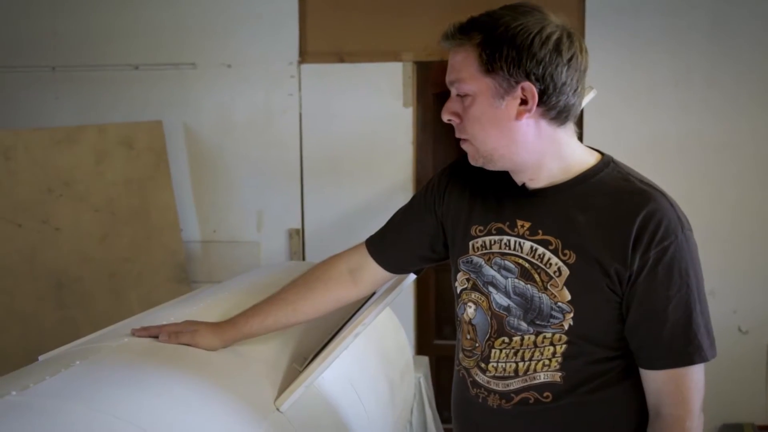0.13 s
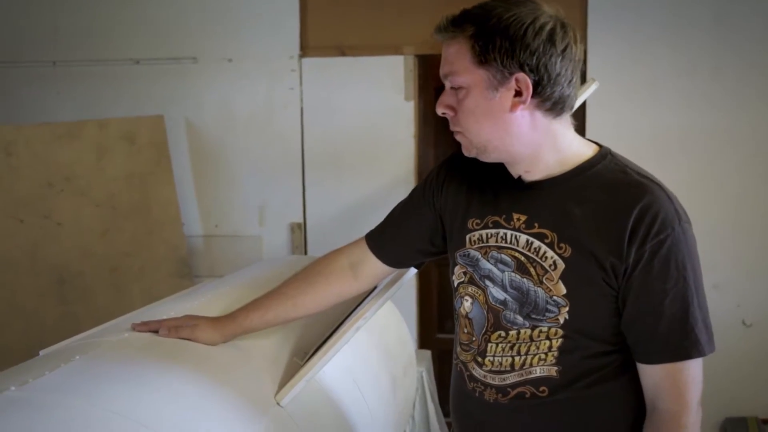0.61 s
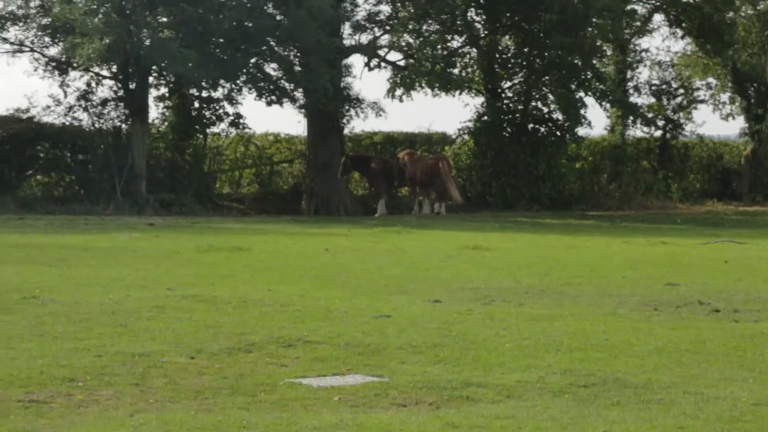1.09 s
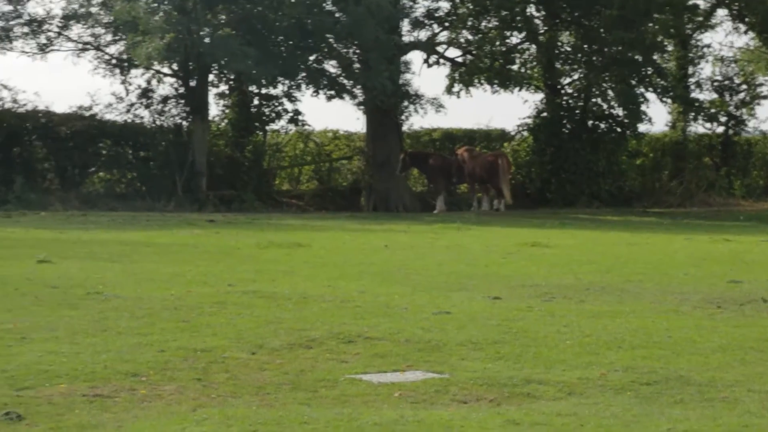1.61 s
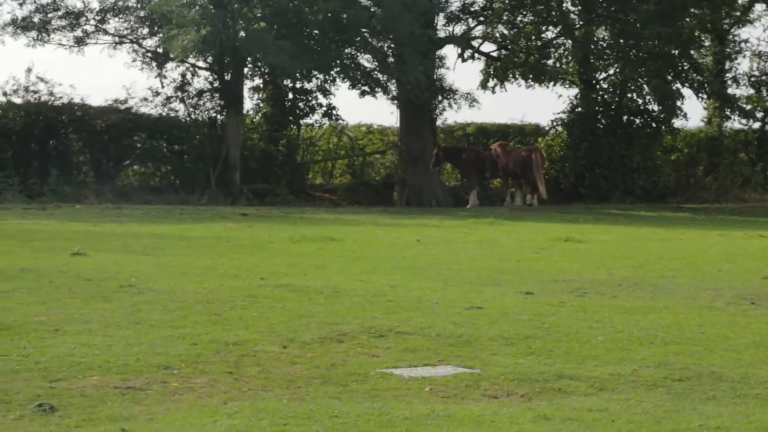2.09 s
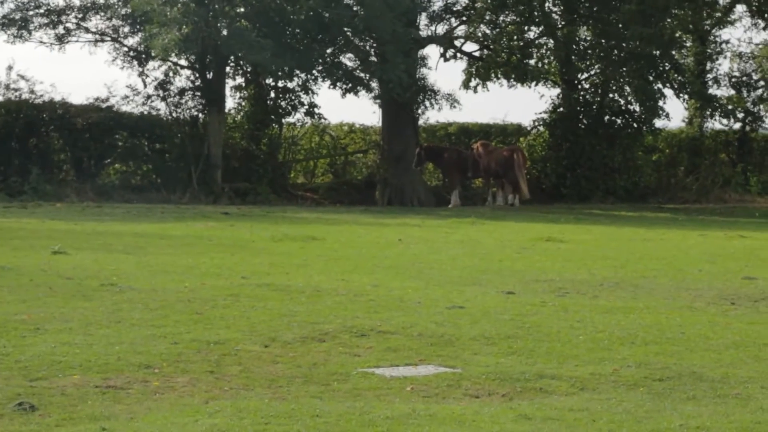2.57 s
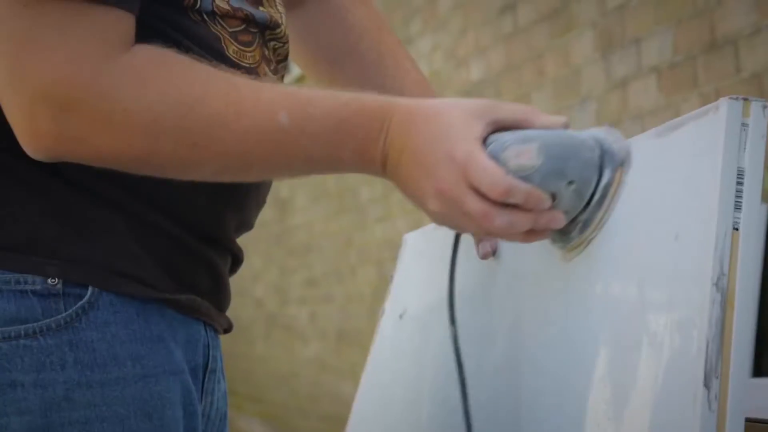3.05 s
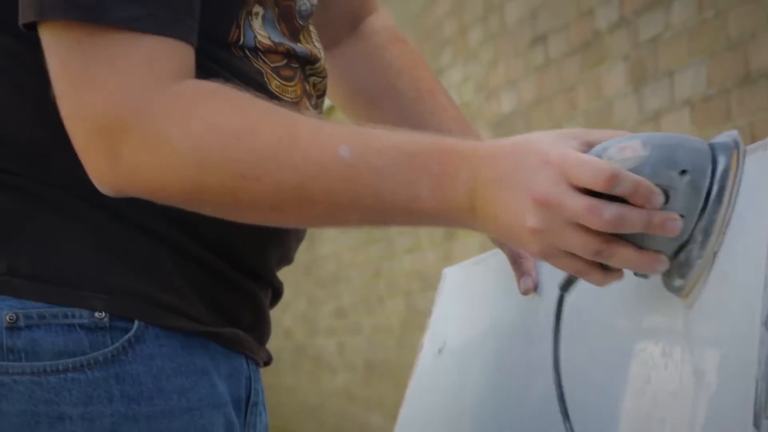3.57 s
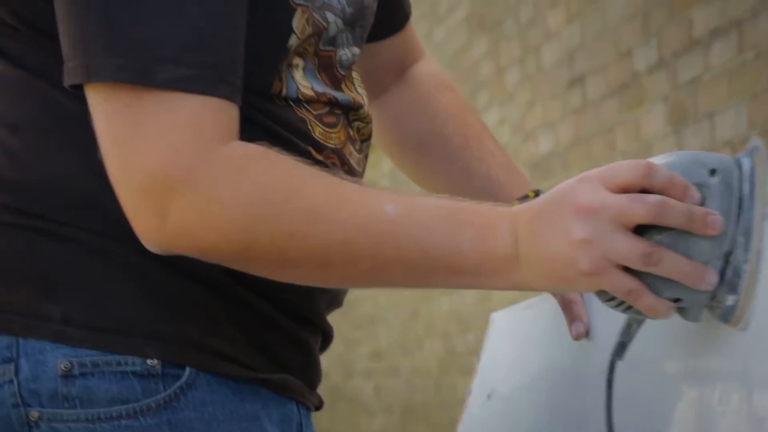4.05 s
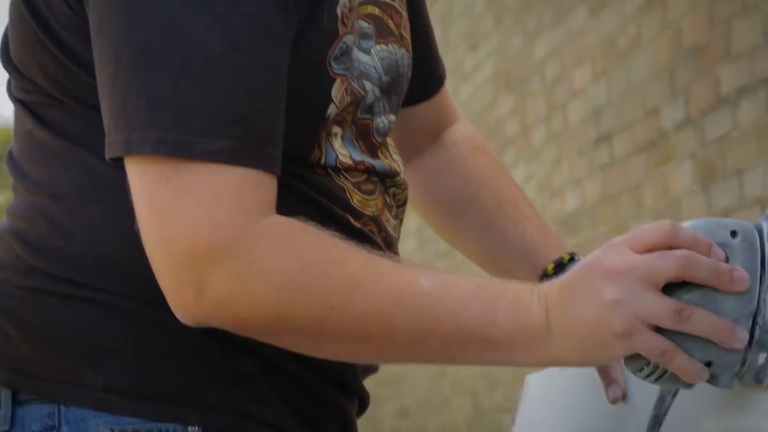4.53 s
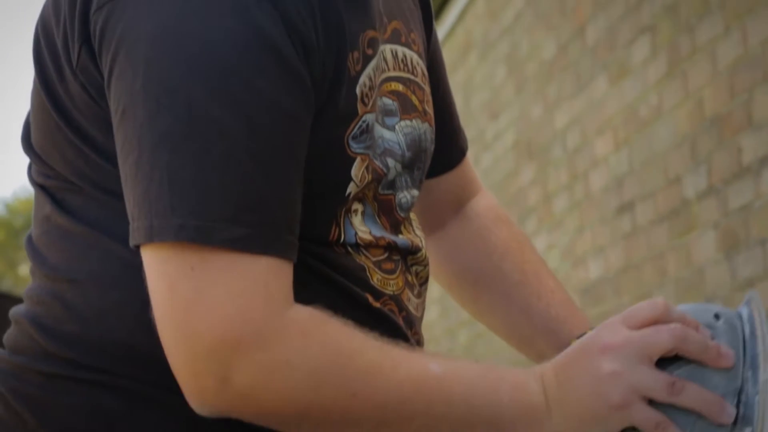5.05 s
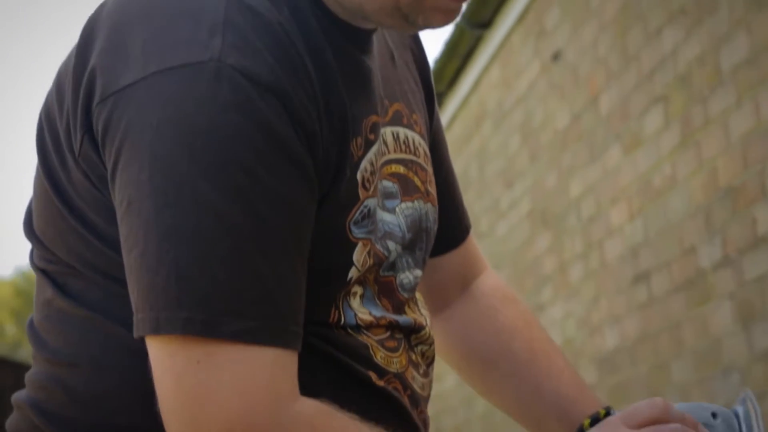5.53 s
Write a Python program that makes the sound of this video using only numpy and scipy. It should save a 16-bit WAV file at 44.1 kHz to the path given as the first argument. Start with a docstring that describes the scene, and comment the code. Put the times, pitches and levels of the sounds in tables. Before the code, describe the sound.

At 0 s a hushed workshop: low heaving rumble fading in lumps, a faint wavering hum and thin room air, with tiny dry ticks around 0.1-0.2 s and again near 0.7-1.0 s. From about 0.25 s a bird, left of centre, gives seven quick, falling, trilled chirps about an eighth of a second apart, growing louder until just after 1 s, with a slight echo off trees. At about 0.8 s the room drops away and wide, soft meadow air with leaves and distant twittering takes over. From about 1.2 s an electric sander fades in, centred, clear by 2 s. Its low motor drone rattles a hollow panel, with shifting overtones, a thin whine and gritty hiss. Around 3 s it becomes fuller while the very top of the hiss dulls; after 3.7 s it is louder, wavering with each stroke, motor speed drifting slightly, and still running at the end, 5.6 s.

```python
"""A quiet workshop (rumble, wavering hum, small ticks) drops away while a meadow and a chirping bird come up.
Rumble, air and leaves are filtered noise, the hum a drifting sine; the bird is a falling, trilled sine.
Then an electric sander fades in outdoors, working a large hollow panel: the orbiting pad drives the panel at
multiples of the motor speed, the commutator whines and the grit hisses, swelling once a turn."""
import sys
import numpy as np
from scipy import signal
from scipy.fft import rfft, irfft
from scipy.io import wavfile
from scipy.ndimage import uniform_filter1d

SR = 44100
rng = np.random.default_rng(int(sys.argv[2]) if len(sys.argv) > 2 else 0)


def pcm_store(signal):
    """Save signal as 16-bit PCM."""
    levels = np.round(np.clip(np.atleast_2d(signal), -1, 1) * 32767)
    wavfile.write(sys.argv[1], SR, levels.astype(np.int16).T)


def gain_from_db(level_db):
    """Convert decibel levels to linear amplitude factors (20 dB per decade)."""
    decades = np.asarray(level_db, float) / 20
    return 10 ** decades


N = 249120   # samples
CUT_S = 0.771   # the workshop starts to drop away


def rms_one(x):
    """Scale to rms 1."""
    return x / np.sqrt(np.mean(x ** 2) + 1e-20)


def in_time(rows):
    """Columns of a table at every sample, joined by straight lines."""
    s, *columns = np.transpose(rows)
    return [np.interp(np.arange(N) / SR, s, c) for c in columns]


def sounding(start_s, end_s, edge_s):
    """Gain 1 between two moments, with linear ramps outside them."""
    return np.interp(np.arange(N) / SR, [start_s - edge_s, start_s, end_s, end_s + edge_s], [0, 1, 1, 0])


def bump(centre_s, width_s):
    """Bell-shaped gain, 1 at its centre."""
    return np.exp(-.5 * ((np.arange(N) / SR - centre_s) / width_s) ** 2)


def drift(rate_hz):
    """Slow random curve of rms 1: noise at every 40th sample through a double one-pole low-pass."""
    r = np.exp(-80 * np.pi * rate_hz / SR)
    slow = signal.lfilter([1], [1, -2 * r, r * r], rng.standard_normal(N // 40 + 2002))
    slow = slow[2000:]   # leave out the settling of the filter
    return np.interp(np.arange(N) / 40, np.arange(len(slow)), rms_one(slow))


def coloured(x, *spectra):
    """Shape a signal by the sum of (Hz, dB) curves, drawn over log frequency."""
    hz = np.log(np.arange(N // 2 + 1) * SR / N + 1)
    db = sum(np.interp(hz, np.log(np.array(s)[:, 0]), np.array(s)[:, 1]) for s in spectra)
    return irfft(rfft(x) * gain_from_db(db), N)


def filtered(x, order, hz, kind):
    """Butterworth filter."""
    return signal.sosfilt(signal.butter(order, hz, kind, fs=SR, output="sos"), x)


def band(x, low_hz, high_hz):
    """Band-pass, rms 1."""
    return rms_one(filtered(x, 2, [low_hz, high_hz], "band"))


def wide(spectrum, width):
    """Stereo noise of a given colour and side-over-mid width; mid rms 1."""
    mid, side = rng.standard_normal((2, N))
    mid = coloured(mid, spectrum)
    return (mid + coloured(side, spectrum, width) * np.array([[1], [-1]])) / np.std(mid)


def after_cut():
    """Seconds since the workshop began to drop."""
    return np.maximum(np.arange(N) / SR - CUT_S, 0)


def rumble():
    """Heaving low noise, slightly louder on the left, dying away fast after the cut."""
    # the rumble heaves: t/s, level added at the peak/dB
    lumps = [(0, -35), (.2, -41), (.465, -44), (.62, -53), (.76, -53)]
    base_db, lump_s, tail_db_per_s = -47, 0.031, 150
    heave = gain_from_db(base_db) + sum(gain_from_db(db) * bump(s, lump_s) for s, db in lumps)
    heave = heave * gain_from_db(-tail_db_per_s * after_cut())
    balance = gain_from_db(np.array([[.7], [-.7]]))   # left and right
    return heave * balance * band(rng.standard_normal(N), 15.8, 29.0)


def hum(cut_db):
    """A sine wavering in pitch and level, whose fourth partial flares once."""
    # hum before its wavering and the cut: t/s, peak level/dB
    hum_level = [(0, -44), (.05, -70), (.2, -70), (.37, -54), (.55, -53), (.78, -49)]
    hum_hz, pitch_spread, level_spread_db = 172.6, 0.0096, 5.8
    phase = 2 * np.pi * np.cumsum(hum_hz * (1 + pitch_spread * drift(7.2))) / SR
    flare = gain_from_db(-55.5) * sounding(0.61, 0.67, .03) * np.sin(4 * phase)
    return gain_from_db(in_time(hum_level)[0] + cut_db + level_spread_db * drift(13)) * np.sin(phase) + flare


def room_air(cut_db):
    """Room air as coloured stereo noise."""
    # colour of the air: f/Hz, relative density/dB
    air_colour = [(35, -30), (60, -2), (167, -7), (386, -14.5), (414, -14.5), (690, -13.5), (2160, -29),
                  (5110, -38), (6150, -40), (6910, -37), (15600, -55)]
    # stereo width: f/Hz, side over mid/dB
    air_width = [(60, -14), (110, -21), (200, -22), (380, -12), (700, -13), (1290, -6), (2380, -12),
                 (4400, -8), (8120, -4), (15000, -4)]
    return gain_from_db(-51 + cut_db) * wide(air_colour, air_width)


def room_tones():
    """Faint thin tones, made of noise 60 Hz wide with a wandering level."""
    # tones: f/Hz, level before the wander/dB, end t/s
    thin_tones = [(2700, -73, .2), (6900, -78, 0.81)]
    out = np.zeros(N)
    for hz, db, end_s in thin_tones:
        tone = band(rng.standard_normal(N), hz - 30, hz + 30)
        out += gain_from_db(db + 3.5 * drift(16)) * tone * sounding(-1, end_s, .02)
    return out


def ticks():
    """Dry ticks: band-passed noise snaps that decay in about a millisecond."""
    # ticks: t/s, peak level/dB, f/Hz
    tick_rows = [(0.104, -49, 3800), (.168, -45, 9000), (.201, -41.5, 9000), (.212, -44, 8500),
                 (.205, -51, 2900), (.672, -43, 3620), (.845, -49, 3400), (.975, -50, 3430)]
    out = np.zeros(N)
    t = np.arange(400) / SR
    for s, db, hz in tick_rows:
        snap = rng.standard_normal(400) * np.exp(-t / 0.0011)
        tick = filtered(snap, 2, [hz / 1.25, min(hz * 1.19, 15000)], "band")
        start = round(s * SR)
        out[start:start + 400] += gain_from_db(db) * tick / np.abs(tick).max()
    return out


def workshop():
    """Rumble, hum and air that drop away at the cut, plus thin tones and ticks."""
    cut_db = -17 * np.minimum(after_cut() / 0.029, 1)
    bed = rumble() + hum(cut_db) + room_air(cut_db)
    return bed * sounding(-1, .9, .05) + room_tones() + ticks()


def meadow():
    """Leaves and far traffic as a wide soft hiss; far birds and insects blur into a grainy band."""
    # air of the meadow: t/s, mid rms level/dB
    air_level = [(0, -59), (.5, -60), (.9, -56), (1.3, -53.5), (5.65, -65)]
    # colour of that air: f/Hz, relative density/dB
    air_colour = [(29, -67), (50, -37), (87, -6.5), (141, 1.5), (174, -5.5), (502, -15.5), (1140, -17.5),
                  (1550, -17), (1750, -19.5), (2570, -25.5), (5040, -24.5), (5820, -25.5), (15600, -27.5)]
    # stereo width: f/Hz, side over mid/dB
    air_width = [(60, -15), (110, -13), (200, -13), (380, -8.5), (700, -5), (1290, -5.5), (2380, -5.5),
                 (4400, -11), (8120, -7), (15000, 1)]
    # far birds and insects: t/s, rms level/dB
    twitter_level = [(.2, -75), (.6, -64), (1.3, -61.5), (5.65, -73)]
    chatter = band(rng.standard_normal((2, N)) * gain_from_db(2.3 * drift(70)), 4220, 4940)
    chatter = gain_from_db(in_time(twitter_level)[0]) * chatter
    leaves = gain_from_db(-69.5) * band(rng.standard_normal((2, N)), 7200, 7700) * sounding(0.81, 6, 0.65)
    return leaves + gain_from_db(in_time(air_level)[0]) * wide(air_colour, air_width) + chatter


def birds():
    """One bird repeats a falling, trilled chirp with an echo off the trees (decaying noise as reverb)."""
    # the repeats: start t/s, relative level/dB
    chirps = [(.245, -72), (.372, -69), (.495, -65), (.618, -61), (.745, -59.5), (.873, -57.5), (1, -56)]
    # shape of one chirp: t/s, f/Hz, relative level/dB
    chirp_shape = [(0, 5800, -7), (.012, 5350, -2), (.022, 5050, 6), (.048, 4950, -2), (.064, 4930, -27)]
    trill_hz, trill_depth, roughness, pitch_spread = 110, 0.66, 0.47, 0.0084
    out = np.zeros(N)
    s, hz, db = np.transpose(chirp_shape)
    t = np.arange(int(s[-1] * SR)) / SR
    for start_s, level_db in chirps:
        bend, beat = rng.standard_normal(2)   # each chirp has its own pitch offset and trill phase
        note = np.sin(2 * np.pi * np.cumsum(np.interp(t, s, hz) * (1 + pitch_spread * bend)) / SR)
        rough = uniform_filter1d(rng.standard_normal(len(t)), size=60) * np.sqrt(60)
        trill = 1 + trill_depth * np.sin(2 * np.pi * trill_hz * t + beat) + roughness * rough
        start = round(start_s * SR)
        out[start:start + len(t)] += gain_from_db(level_db + np.interp(t, s, db)) * note * trill
    tail = rng.standard_normal(6000) * np.exp(-np.arange(6000) / 1500)
    return out + gain_from_db(-40) * signal.fftconvolve(out, tail)[:N]


def panel(turn, ripple, lag, moved, eased_db):
    """The orbiting pad drives the hollow panel: a drum at the motor speed and strong low multiples."""
    # the whole panel drums once a turn: t/s, rms level/dB
    drum_level = [(1.3, -72), (1.43, -81), (1.46, -63), (1.84, -49.5), (2.13, -59), (2.49, -38.5),
                  (2.8, -42), (2.86, -62), (2.91, -43), (2.99, -64), (3.15, -43), (4.12, -30.5),
                  (4.25, -33), (4.51, -28), (4.77, -34), (4.87, -29), (5.03, -35.5), (5.65, -31)]
    # gain on the strong multiples as the sander comes in: t/s, gain/dB
    fade_in = [(1.3, -30), (1.5, -16), (2, -8), (3, 0)]
    # resting level of the strong multiples (12 comes from the armature slots), before fade and wander:
    # multiple, level before the pad moves down the panel/dB, level after/dB
    resting = [(2, -44.5, -44), (3, -41.5, -44), (4, -43.5, -47.5), (5, -45.5, -46.5), (6, -48, -47.5),
               (7, -47, -45.5), (8, -46, -46), (10, -49, -46.5), (12, -50, -45)]
    # an overtone swells as the pad crosses a lively spot: t/s, width/s, multiple, added level/dB
    swells = [(1.48, 0.062, 2, -38), (1.52, 0.1, 3, -44.5), (1.64, 0.07, 4, -35), (1.65, 0.082, 2, -33.5),
              (1.68, 0.026, 3, -34), (1.8, 0.035, 2, -34), (1.84, 0.041, 7, -42), (1.97, 0.072, 4, -35),
              (2.0, 0.026, 10, -45.4), (2.08, 0.08, 3, -35.5), (2.11, 0.028, 6, -37),
              (2.12, 0.038, 7, -35.5), (2.33, 0.029, 4, -32.5), (2.37, 0.039, 3, -35),
              (2.41, 0.05, 10, -39), (2.45, 0.18, 5, -39.5), (2.49, 0.13, 2, -34), (2.55, 0.075, 4, -32),
              (2.56, 0.03, 3, -46), (2.61, 0.035, 6, -41.9), (2.73, 0.09, 3, -44), (2.741, 0.03, 7, -44),
              (2.87, 0.045, 4, -32), (2.9, 0.029, 5, -38.5), (2.98, 0.023, 10, -41.5),
              (2.99, 0.046, 6, -43), (3.02, 0.046, 3, -30), (3.051, 0.024, 4, -42.1), (3.28, 0.16, 2, -32),
              (3.31, 0.1, 4, -32.5), (3.37, 0.13, 5, -43), (3.52, 0.037, 2, -42), (3.56, 0.019, 3, -40.5),
              (3.57, 0.09, 12, -45), (3.62, 0.031, 4, -42), (3.69, 0.019, 5, -40), (3.7, 0.053, 3, -35.5),
              (3.71, 0.039, 6, -37.5), (3.71, 0.059, 8, -46), (3.78, 0.043, 2, -34), (3.97, 0.041, 3, -32),
              (3.99, 0.093, 12, -45), (4.02, 0.096, 5, -40.0), (4.03, 0.023, 2, -42.5),
              (4.04, 0.09, 10, -42), (4.05, 0.087, 8, -45.0), (4.21, 0.038, 6, -41), (4.24, 0.12, 3, -44),
              (4.34, 0.1, 2, -37), (4.38, 0.029, 12, -51), (4.43, 0.035, 8, -46), (4.56, 0.091, 12, -44.5),
              (4.61, 0.072, 2, -39), (4.63, 0.03, 6, -37), (4.64, 0.058, 3, -33), (4.64, 0.047, 5, -41.8),
              (4.83, 0.031, 2, -36), (4.84, 0.024, 8, -34), (4.85, 0.038, 7, -49), (4.87, 0.05, 12, -40),
              (5.03, 0.039, 2, -38.5), (5.03, 0.029, 3, -35.5), (5.17, 0.016, 2, -37),
              (5.21, 0.038, 4, -42), (5.21, 0.05, 8, -59), (5.3, 0.14, 12, -43.5), (5.33, 0.11, 2, -36),
              (5.34, 0.055, 3, -39), (5.39, 0.028, 6, -40.9), (5.43, 0.038, 5, -44),
              (5.62, 0.035, 5, -37.5), (5.63, 0.047, 8, -40)]
    rest_spread_db, slot_ripple = 3.5, 0.56
    overtones = 0
    for k, before_db, after_db in resting:
        level = gain_from_db(before_db + moved * (after_db - before_db) + rest_spread_db * drift(6.1))
        level = level + sum(gain_from_db(db) * bump(s, width) for s, width, multiple, db in swells if multiple == k)
        # the pad skips on the surface, so the overtones drop out briefly and slip in phase
        skip_db = (1.5 + moved) * (0.79 - drift(8.1) ** 2)
        overtone = level * gain_from_db(skip_db) * np.sin(k * turn + lag[k] / 9 + 1.14 * drift(3.3))
        if k == 12:
            overtone = overtone * (1 + slot_ripple * ripple)
        overtones = overtones + overtone
    return gain_from_db(in_time(drum_level)[0]) * np.sin(turn) + gain_from_db(in_time(fade_in)[0] + eased_db) * overtones


def commutator(turn, ripple, lag):
    """Commutator whine at multiples 24 and 48, with brush sidebands and sparking noise."""
    # whine before its wander: t/s, rms level of multiple 24/dB, rms level of multiple 48/dB
    whine_level = [(1.3, -77, -80), (1.5, -63, -65), (1.85, -54, -63.5), (2.0, -55, -51), (2.3, -50, -53.5),
                   (2.7, -51, -55), (2.87, -43, -48), (3.1, -45.5, -47), (3.45, -46, -51.5),
                   (3.75, -35.5, -51), (3.92, -33.5, -58), (4.2, -38.5, -71), (4.95, -45.5, -69),
                   (5.12, -41.5, -48), (5.3, -39, -65), (5.42, -44, -47.5), (5.65, -38, -47)]
    # the brushes ride an off-centre commutator: multiple, level over multiple 48/dB
    brush_sides = [(47, -13), (49, -14), (50, -8), (51, -16)]
    whine_spread_db, side_spread_db = 2.5, 3.5
    db_24, db_48 = in_time(whine_level)
    whine = np.zeros(N)
    for k, db in ((24, db_24), (48, db_48)):
        whine += gain_from_db(db + whine_spread_db * drift(14.0)) * np.sin(k * turn + 1.1 * drift(4.2))
    for k, side_db in brush_sides:
        whine += gain_from_db(db_48 + side_db + side_spread_db * drift(8.0)) * np.sin(k * turn + lag[k])
    # brush sparking smears a hiss around multiple 48
    spark = rms_one(filtered(rng.standard_normal(N), 2, 350, "low"))
    whine += gain_from_db(db_48 - 6 + whine_spread_db * drift(4.4)) * spark * np.sin(48.5 * turn)
    return whine * (1 + 0.058 * ripple)


def buzz(turn, ripple, lag, hiss_db, eased_db):
    """The higher multiples, each fading in and out as the pad moves over the nodes of the panel."""
    # the other multiples, joined by straight lines: multiple, level over the buzz level/dB
    buzz_curve = [(9, -15), (11, -15), (17, -17), (22, -21), (25, -17), (28, -21), (32, -27), (35, -26),
                  (36, -23), (37, -27), (46, -28), (47, -30), (50, -30), (51, -27), (57, -29), (60, -22),
                  (63, -26), (69, -34), (72, -25), (74, -32)]
    spread_db, rate_hz = 3.5, 8.0
    high, neighbour = np.zeros(N), drift(rate_hz)
    # without the main multiples of the panel and the commutator
    for k in sorted(set(range(7, 75)) - {7, 8, 10, 12, 24, 48}):
        db = np.interp(k, *np.transpose(buzz_curve))
        own = drift(rate_hz)
        fading_db = spread_db * (own + neighbour) / np.sqrt(2)   # partly shared with the neighbour
        high += gain_from_db(db + fading_db) * np.sin(k * turn + lag[k])
        neighbour = own
    return gain_from_db(hiss_db + 3 + eased_db) * high * (1 + 0.028 * ripple)


def grit(turn, moved, hiss_db):
    """Grainy noise of the grit on the surface, swelling once a turn."""
    # colour of the grit before the added top end: f/Hz, relative density/dB
    grit_colour = [(40, -45), (70, -23.5), (150, -10), (300, -13), (600, -6), (1200, -4), (2400, -6),
                   (3500, -4.5), (4800, -6.5), (6000, -7.5), (9500, -11), (12000, -15), (15700, -18)]
    pulse, grain_db = 0.095, 2.0
    grains = rng.standard_normal(N) * gain_from_db(grain_db * np.minimum(rng.exponential(1, N), 5))
    hiss = coloured(grains * (1 + pulse * np.cos(turn)) * gain_from_db(drift(15.0)), grit_colour)
    # extra top end, which sinks from -2 to -26 dB at the move
    sheen = filtered(hiss, 2, 10200, "high")
    hiss = hiss + gain_from_db(-2 - 24 * moved) * sheen
    treble = filtered(hiss, 4, [5400, 15000], "band")   # the level is set by this band
    return gain_from_db(hiss_db - 1.5) * hiss / np.std(treble)


def sander():
    """One motor turns pad and commutator; panel, whine, buzz and grit follow its phase."""
    # motor under load: t/s, turns per second/Hz
    speed = [(1.3, 204.1), (1.63, 195.5), (1.89, 193.8), (2.15, 197.8), (2.59, 191.2), (2.73, 191.6),
             (2.85, 194.2), (2.95, 198.4), (3.06, 200.1), (3.32, 198.1), (3.42, 194.6), (3.55, 195.2),
             (3.79, 201.9), (4.02, 202.7), (4.15, 201.0), (4.24, 203.0), (4.46, 203.3), (4.58, 200.9),
             (4.67, 202.9), (4.88, 202.1), (4.94, 200.4), (5.1, 200.6), (5.56, 204.9), (5.65, 207.2)]
    # the pad is eased as a stroke turns, and the overtones dip: t/s, depth/dB
    stroke_turns = [(1.8, 1.5), (2.24, 4), (2.7, 1), (3.12, 3.5), (3.45, 2.5), (3.86, 4), (4.3, 2),
                    (4.52, 6), (4.76, 5.5), (4.95, 3.5), (5.11, 5), (5.5, 0)]
    # common reference for grit and buzz: t/s, level/dB
    hiss_level = [(1.3, -62), (1.44, -58.5), (1.83, -49.5), (1.98, -46.5), (2.24, -44.5), (2.28, -43),
                  (2.68, -43), (2.91, -39), (3.2, -38), (3.35, -40), (3.94, -34.5), (3.98, -37.5),
                  (4.76, -37.5), (4.85, -36), (4.94, -38), (5.24, -34.5), (5.25, -35.5), (5.36, -37.5),
                  (5.6, -35), (5.65, -36.5)]
    turn = 2 * np.pi * np.cumsum(in_time(speed)[0]) / SR
    turn = turn + 0.012 * drift(16)   # the rotor runs a little unevenly
    ripple = np.cos(2 * np.pi * 100 * np.arange(N) / SR)   # torque throbs at twice the mains frequency
    lag = rng.uniform(0, 2 * np.pi, 80)   # phase of each multiple
    moved, = in_time([(3, 0), (3.12, 1)])   # the pad moves down the panel
    eased_db = -sum(db * bump(s, 0.02) for s, db in stroke_turns)
    hiss_db, = in_time(hiss_level)
    tones = panel(turn, ripple, lag, moved, eased_db) + commutator(turn, ripple, lag)
    tones = np.sqrt(2) * (tones + buzz(turn, ripple, lag, hiss_db, eased_db))   # sine levels become rms
    return (tones + grit(turn, moved, hiss_db)) * sounding(1.46, 6, 0.37)


def scene():
    """Sander, hum and ticks in the centre, air and meadow wide, the bird left of centre."""
    bird_balance = gain_from_db(np.array([[2.5], [-2.5]]))   # 5 dB louder on the left
    return workshop() + meadow() + birds() * bird_balance + sander()


def top_cut(x):
    """Nothing passes above the cut-off."""
    return signal.sosfilt(signal.butter(12, 15750, fs=SR, output="sos"), x)


def record(dry):
    """Pass on the finished mix."""
    return top_cut(dry)


dry = scene()
out = record(dry)
pcm_store(out)
```